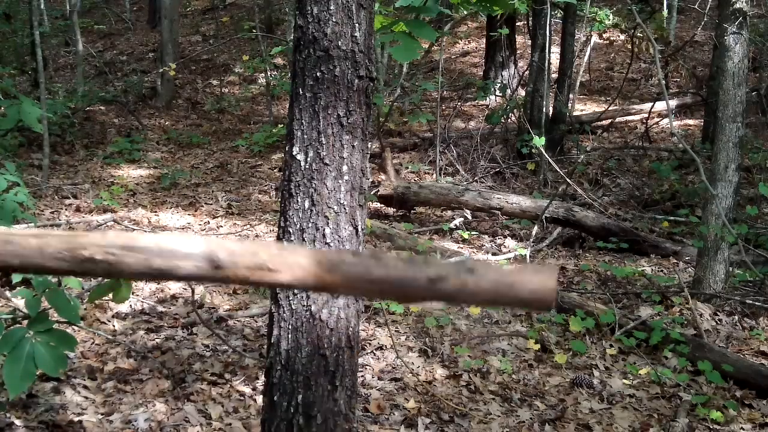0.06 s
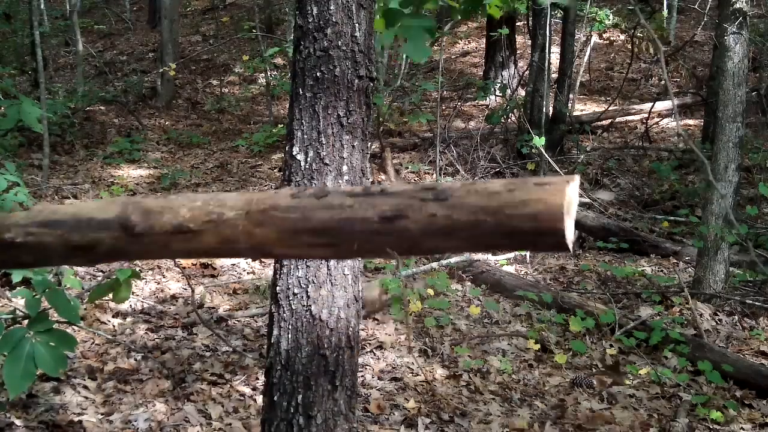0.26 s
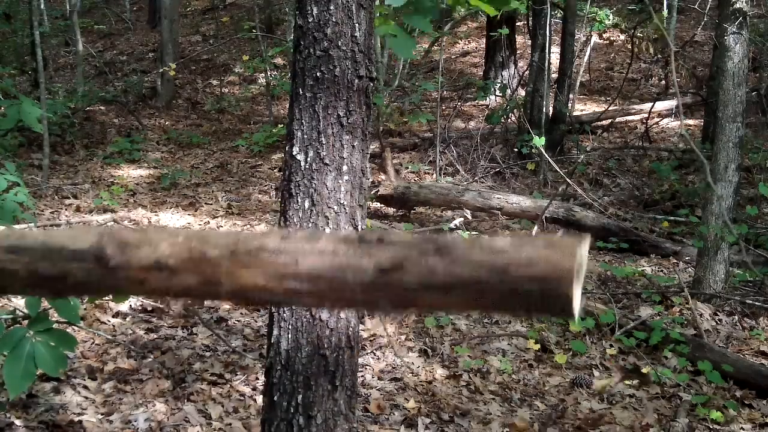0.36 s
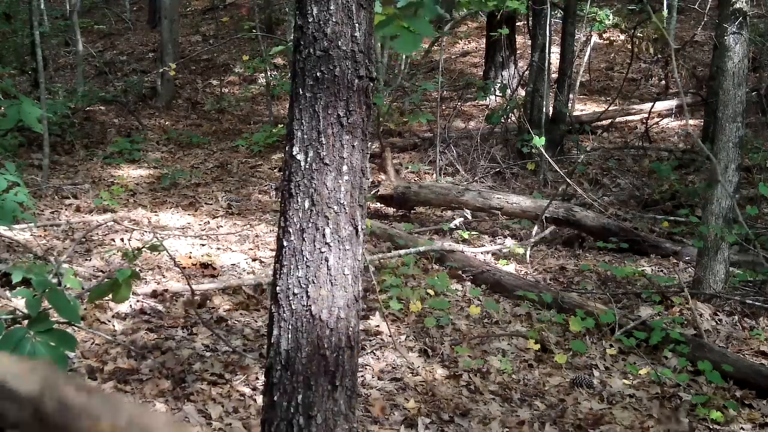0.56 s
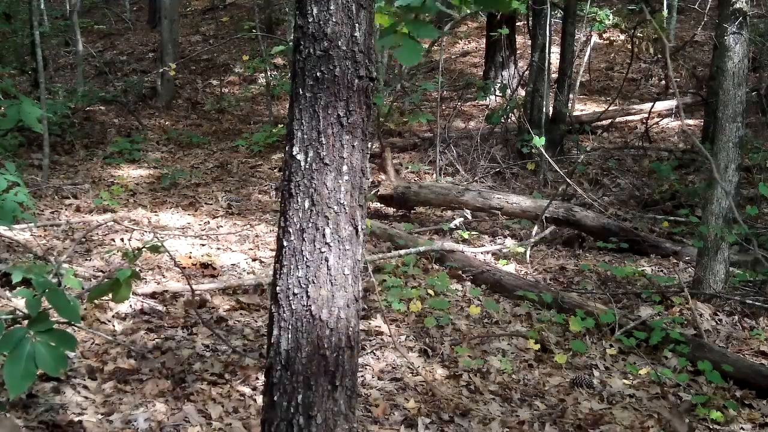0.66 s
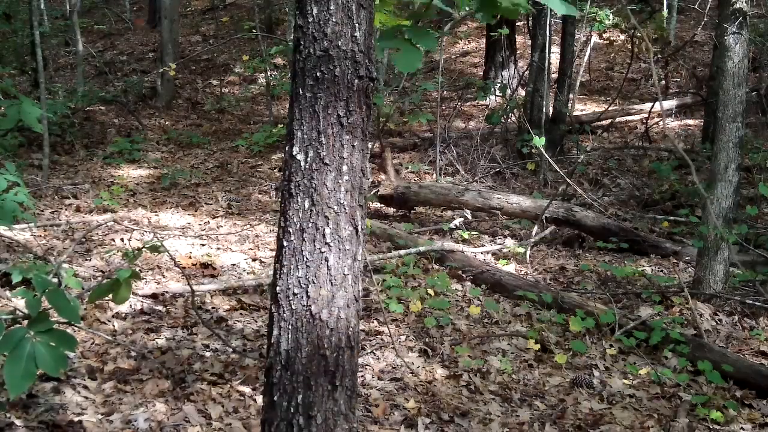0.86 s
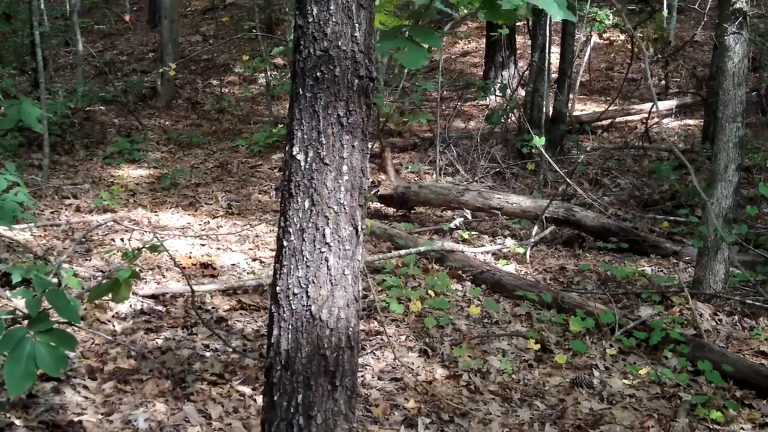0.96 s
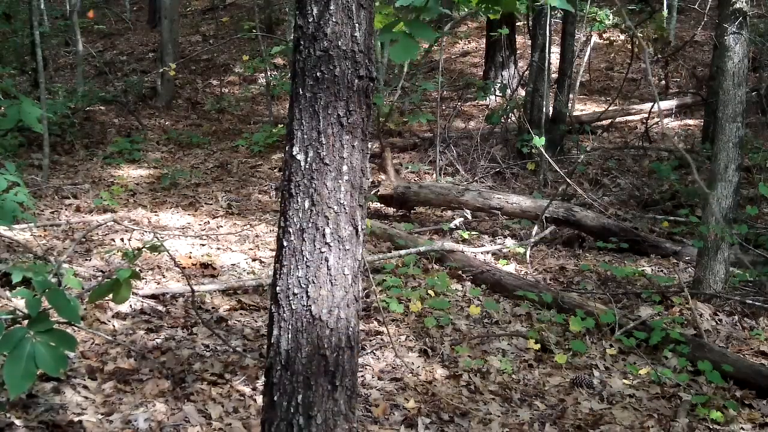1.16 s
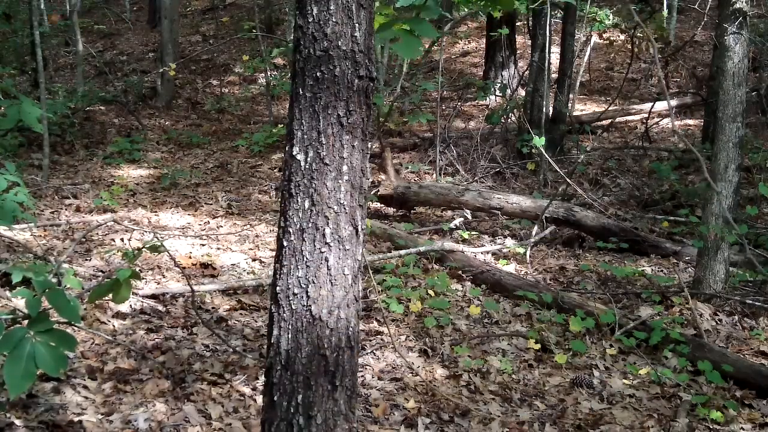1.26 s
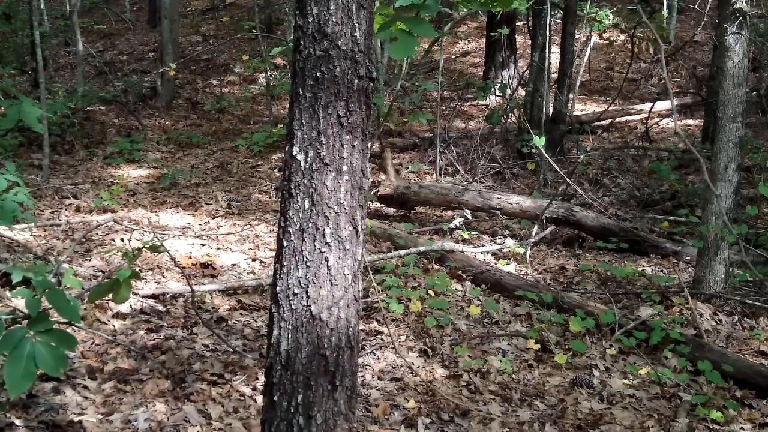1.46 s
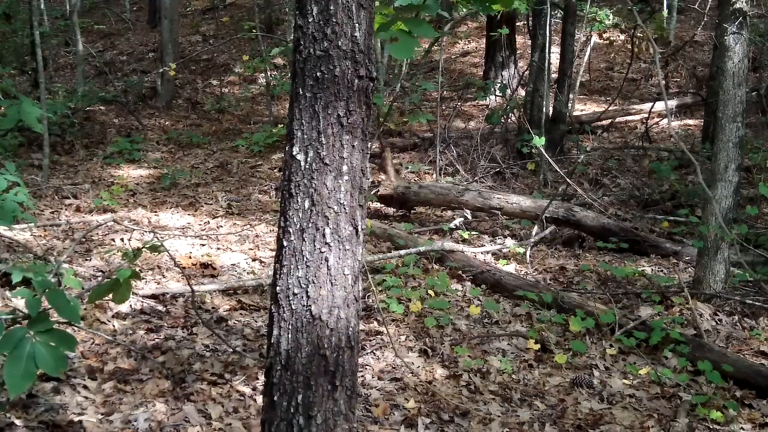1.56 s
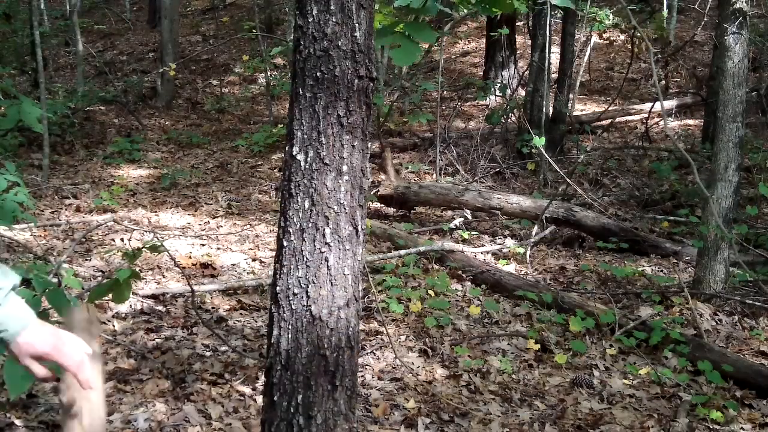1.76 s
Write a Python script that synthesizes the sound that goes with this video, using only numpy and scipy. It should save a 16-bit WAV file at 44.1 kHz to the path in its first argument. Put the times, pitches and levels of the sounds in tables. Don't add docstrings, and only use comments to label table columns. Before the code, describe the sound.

One sharp, clipped wooden whack on a standing tree, then a small crunch in dry leaves

```python
import sys
import numpy as np
from scipy import signal
from scipy.fft import rfft, irfft
from scipy.io import wavfile
from scipy.ndimage import uniform_filter1d

SR = 44100
rng = np.random.default_rng(int(sys.argv[2]) if len(sys.argv) > 2 else 0)


def persist_wave(psi):
    counts = np.round(np.clip(psi, -1, 1) * 32767).astype(np.int16)
    wavfile.write(sys.argv[1], SR, np.atleast_2d(counts).T)


def nominal_scale(level):
    x = np.asarray(level, float) / 20
    return 10 ** x


N = 79380
BLOW_S = .2337


def evened(x):
    return x / np.sqrt(np.mean(x ** 2) + 1e-20)


def read(points, hz):
    f, value = np.transpose(points)
    return np.interp(np.log(hz + 1), np.log(f + 1), value)


def add(mix, s, sound):
    part = mix[round(s * SR):][:len(sound)]
    part += sound[:len(part)]


def noise(count):
    return rng.standard_normal(count)


def drift(count, size):
    return uniform_filter1d(uniform_filter1d(noise(count), size), size)


def colour(x, points, casing=False):
    # f/Hz, width/Hz, level/dB
    port = [(549, 30, 6.5), (1480, 250, 5.5), (2080, 300, 2.5), (3532, 500, 6), (7700, 430, -9)]
    hz = np.fft.rfftfreq(len(x), 1 / SR)
    db = read(points, hz)
    if casing:
        db = db + sum(g / (1 + (2 * (hz - f) / w) ** 2) for f, w, g in port)
    return evened(irfft(rfft(x) * nominal_scale(db), len(x)))


def ring(hz, db, t60):
    t = np.arange(int(1.6 * t60 * SR) + 8) / SR
    return nominal_scale(db - 60 * t / t60) * np.sin(2 * np.pi * hz * t)


def grains(count):
    per_s, size_db = 12000, 2.0
    hit = rng.random(count) < per_s / SR
    size = nominal_scale(size_db * np.minimum(rng.exponential(1, count), 5))
    return hit * size * noise(count)


def woods():
    # f/Hz, level/dB per Hz
    far_wash = [(20, -29.5), (60, -19.5), (200, -12.5), (450, -5), (1000, -6), (2500, -9), (4500, -6),
                (7000, -18.5)]
    wash_db, rumble_db, hiss_db = -62.5, -77.5, -74.5
    swell = evened(drift(N, 2500))
    wash = colour(noise(N), far_wash + [(9000, -35.5)], True)
    rumble = colour(noise(N), [(20, -12.5), (50, -6), (110, -0.5), (250, -2.5), (500, -31)])
    hiss = colour(noise(N), [(7000, -25), (8000, 0), (12000, .3), (15800, -1.5)])
    return nominal_scale(wash_db - 0.5 + 0.99 * swell) * wash + nominal_scale(rumble_db) * rumble + nominal_scale(hiss_db) * hiss


def rustle():
    # f/Hz, level/dB per Hz
    leaves = [(35, -47), (60, -20.5), (175, -13), (211, -20.5), (249, -10), (590, -10), (897, -8.5),
              (2500, -3.5), (15800, -28.5)]
    # t/s, level/dB
    movement = [(0, -65), (0.029, -56), (0.063, -57), (.09, -66), (0.192, -57.5), (0.222, -49), (.3, -70),
                (.9, -64.5), (0.969, -63.5), (1.08, -68.5), (1.2, -64), (1.33, -69.5), (1.5, -60.5),
                (1.6, -57.5), (1.68, -52), (1.765, -52), (1.79, -43.5)]
    s, db = np.transpose(movement)
    bursts_db = evened(drift(N, 300))
    return nominal_scale(np.interp(np.arange(N) / SR, s, db) + bursts_db) * colour(grains(N), leaves, True)


def ticks():
    tick_times = [.0215, .049, .060, .104, .331, .460, .771, .826, .968, .970, 1.1425, 1.195, 1.196, 1.197,
                  1.519]
    # level/dB, f/Hz, t60/s, snap level/dB
    twigs = [(-37, 2800, .004, -46), (-35, 1900, .010, -65), (-47, 3000, .012, -56), (-44, 1600, .012, -70),
             (-62, 9000, .012, -50), (-41, 2000, .004, -66), (-47, 5500, .002, -56), (-58, 8500, .005, -58),
             (-47, 1300, .025, -70), (-51, 2300, .025, -70), (-38, 2100, .004, -70), (-43, 3700, .014, -60),
             (-48, 1900, .01, -58), (-52, 400, .015, -70), (-48, 2000, .012, -70)]
    out = np.zeros(N)
    for s, (db, hz, t60, snap_db) in zip(tick_times, twigs):
        tick = ring(hz, db, t60) + ring(hz * 1.2, db - 11.5, t60)
        roughness = 1 + 1.5 * drift(4000, 12)[:len(tick)]
        add(out, s, tick * roughness)
        snap = np.diff(noise(41)) * np.exp(-np.arange(40) / 10.0)
        add(out, s, nominal_scale(snap_db) * snap)
    return out


def landing():
    # f/Hz, level/dB per Hz
    crushed = [(120, -26), (200, -4.5), (929, -15), (1490, -1.5), (1790, -8.5), (3400, -12.5), (7740, -27),
               (15800, -40.5)]
    knock_times = [.4815, .4850, .484, .4880, .4892, .482, .483, .4705]
    # level/dB, f/Hz, t60/s
    knocks = [(-30, 1450, .012), (-29, 800, .010), (-41, 330, .06), (-38, 3350, .014), (-53, 10300, .005),
              (-46, 160, .2), (-41, 540, .05), (-46, 4400, .015)]
    start_s, rise_s, hold_s = .468, .005, .023
    level_db, t60_s = -42.5, .15
    out, t = np.zeros(N), np.arange(SR // 4) / SR
    fall = nominal_scale(level_db - 60 * np.maximum(t - hold_s, 0) / t60_s)
    crunch = colour(grains(len(t)), crushed, True)
    add(out, start_s, np.minimum(t / rise_s, 1) * fall * crunch)
    for s, (db, hz, t60) in zip(knock_times, knocks):
        add(out, s, ring(hz, db, t60))
    return out


def thud():
    thud_hz, thud_db, thud_t60 = 100, -40, .5
    hum_hz, hum_width_hz, hum_db, hum_t60 = 574, 60, -63.5, 4.0
    out, t = np.zeros(N), np.arange(N) / SR
    ground = colour(noise(N), [(25, -12), (thud_hz, 0), (200, -14), (400, -60)])
    trunk = evened(signal.lfilter(*signal.iirpeak(hum_hz, hum_hz / hum_width_hz, SR), noise(N)))
    both = ground * nominal_scale(thud_db - 60 * t / thud_t60) + trunk * nominal_scale(hum_db - 60 * t / hum_t60)
    add(out, BLOW_S, np.minimum(t / .004, 1) * both)
    return out


def scatter(x, decays, delay_s, db):
    taps, gap = np.zeros(66150), 20
    at = np.arange(0, len(taps) - gap, gap)
    taps[at + rng.integers(0, gap, len(at))] = rng.choice([-1., 1.], len(at))
    hz, t, z = signal.stft(taps, SR, nperseg=256)
    dying = nominal_scale(-60 * t / read(decays, hz)[:, None])
    tail = signal.istft(z * dying, SR, nperseg=256)[1]
    out = np.zeros(N)
    add(out, delay_s, nominal_scale(db) * signal.fftconvolve(x, tail / np.linalg.norm(tail)))
    return out


def trees(hit):
    # f/Hz, level/dB per Hz
    returned = [(88, -43.5), (150, -12.5), (307, -20.5), (551, -6), (713, -6), (1430, -5), (2390, -8),
                (7590, -37.5), (12000, -40.5), (15600, -70.5), (22000, -120)]
    # f/Hz, t60/s
    near = [(100, .2), (300, .15), (700, 0.27), (1500, 0.1), (4000, 0.33), (12000, .08)]
    # f/Hz, t60/s
    far = [(100, 0.95), (300, 0.13), (550, 1.764), (1500, 1.2), (4000, .8), (12000, 0.31)]
    near_db, far_db, ring_echo_db = -20, -31, -35.5
    click = 1. * (np.arange(N) == round(BLOW_S * SR))
    whack = colour(click, returned, True) * np.linalg.norm(hit) / np.sqrt(N)
    into_woods = nominal_scale(far_db) * whack + nominal_scale(ring_echo_db) * hit
    return scatter(whack, near, .014, near_db) + scatter(into_woods, far, .03, 0)


def blow():
    # f/Hz, level/dB, t60/s
    log_modes = [(258, -4, 0.16), (556.7, -3.5, 0.15), (757, -7, .05), (960, -9, 0.043), (1120, -9.5, .05),
                 (1408, 3, 0.055), (1486, 3.5, 0.074), (1612, -7, .07), (1792, -6.5, 0.065),
                 (1901, 1.5, 0.03), (2178, 0.06, 0.064), (2357, 0, .07), (3360, -10.5, 0.044),
                 (3890, -11, .06)]
    # f/Hz, level/dB per Hz
    splinters = [(88, -40), (150, -13.5), (462, -11.5), (552, -6), (923, -9), (1100, -14.5), (1520, -9),
                 (7000, -46), (9100, -72.5), (15400, -120)]
    # f/Hz, level/dB per Hz
    bark = [(1800, -36.5), (2700, -5), (3800, -4), (5200, -7.5), (6500, -17), (8500, -19), (11000, -21),
            (15800, -36.5)]
    push_hz, push_db, push_decay_s = 515, 3.5, 0.0014
    ring_delay_s, ring_rise_s, ring_db = .0015, 0.00027, -8.5
    grip_s, grip_db, grip_ease_s = 0.011, -7, .002
    clatter_db, clatter_t60 = -21, .08
    crack_db, crack_rise_s, crack_t60 = -15, 0.0014, .014
    chips_db, chips_t60 = -27, .06
    out, t = np.zeros(N), np.arange(SR // 2) / SR

    push = np.sin(2 * np.pi * push_hz * t) + .25 * np.sin(4 * np.pi * push_hz * t)
    add(out, BLOW_S, nominal_scale(push_db) * push * np.exp(-(t / push_decay_s) ** 3))

    rise = np.minimum(t / ring_rise_s, 1)
    held = rise * nominal_scale(grip_db * np.clip((t - grip_s) / grip_ease_s, 0, 1))
    for hz, db, t60 in log_modes:
        mode = ring(hz, db + ring_db, t60)
        add(out, BLOW_S + ring_delay_s, mode * held[:len(mode)])

    clatter = rise * nominal_scale(clatter_db - 60 * t / clatter_t60)
    add(out, BLOW_S + ring_delay_s, clatter * colour(grains(len(t)), splinters, True))

    after = np.maximum(t - crack_rise_s, 0)
    fall = nominal_scale(crack_db - 60 * after / crack_t60) + nominal_scale(chips_db - 60 * after / chips_t60)
    add(out, BLOW_S, np.minimum(t / crack_rise_s, 1) ** 2 * fall * colour(noise(len(t)), bark))
    return out


def scene():
    hit = blow()
    mix = hit + trees(hit) + thud() + landing() + ticks() + rustle()
    bass_cut = signal.butter(2, 310, "high", fs=SR, output="sos")
    return (signal.sosfilt(bass_cut, mix) + woods())[None]


def band_limit(x):
    return signal.sosfilt(signal.butter(12, 16620, fs=SR, output="sos"), x)


def record(dry):
    ceiling = .94
    return band_limit(np.clip(dry, -ceiling, ceiling))


dry = scene()
out = record(dry)
persist_wave(out)
```